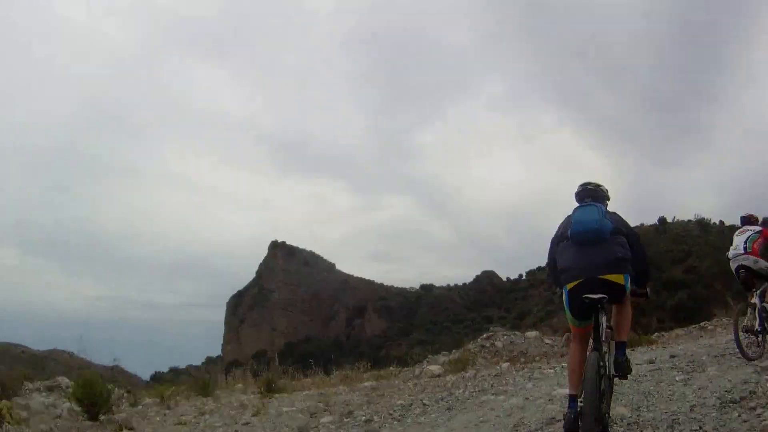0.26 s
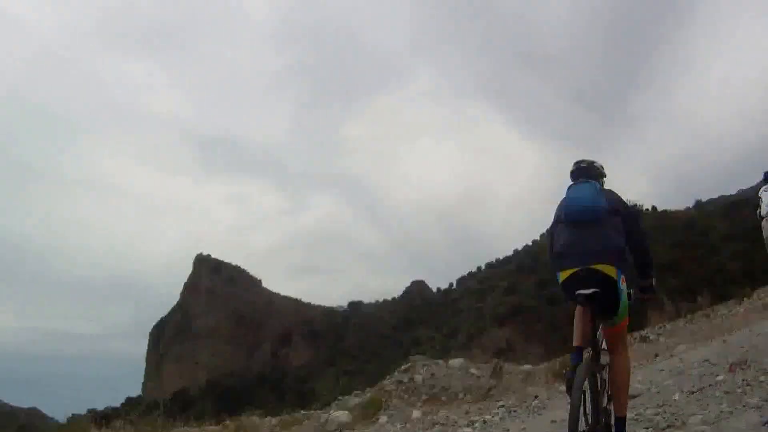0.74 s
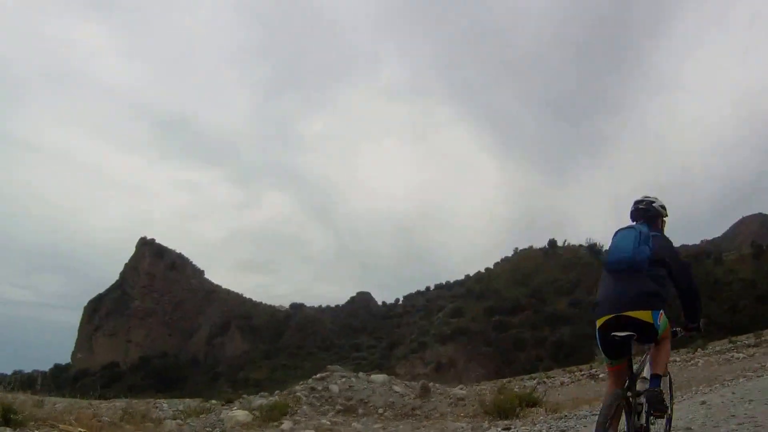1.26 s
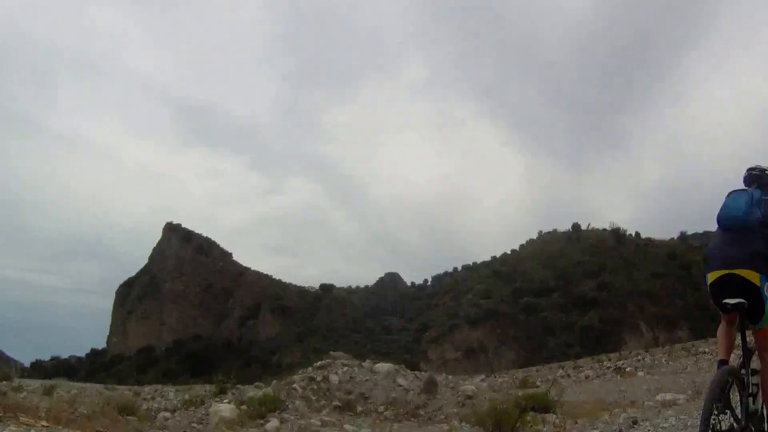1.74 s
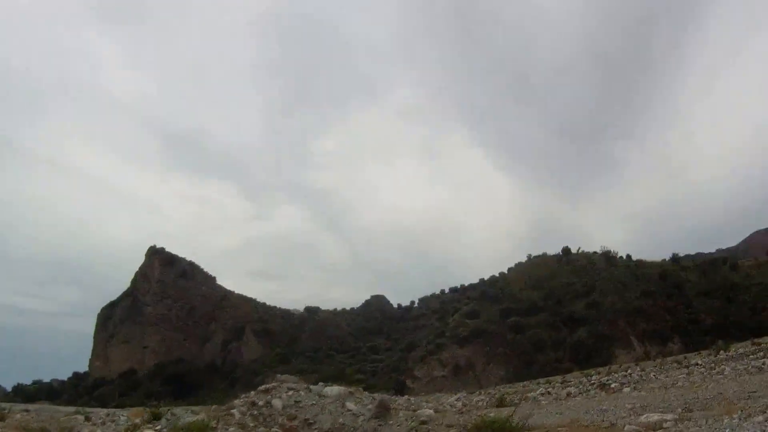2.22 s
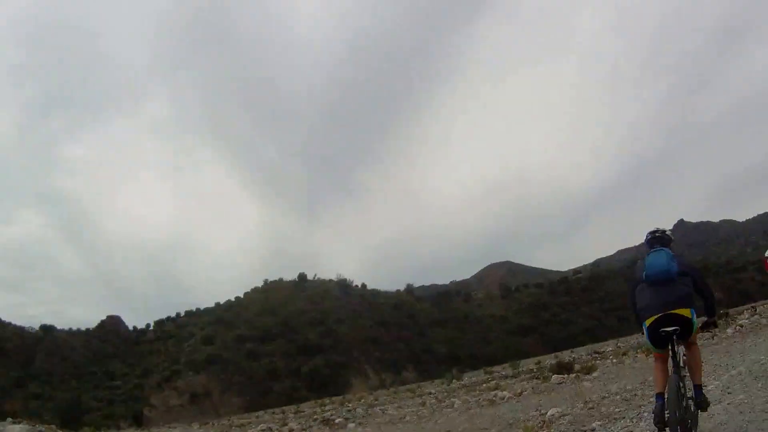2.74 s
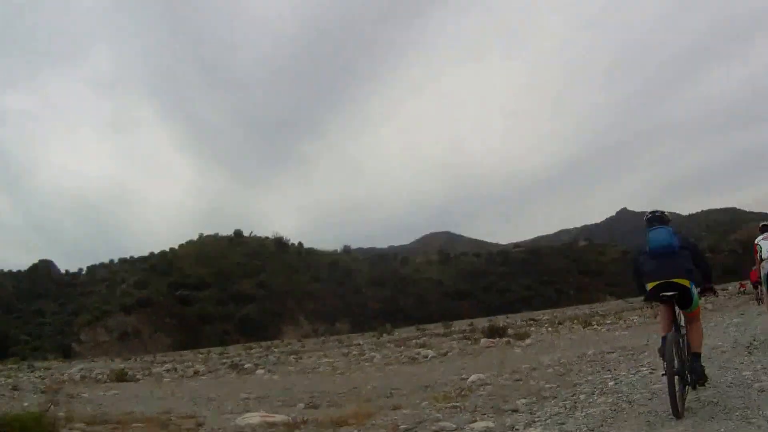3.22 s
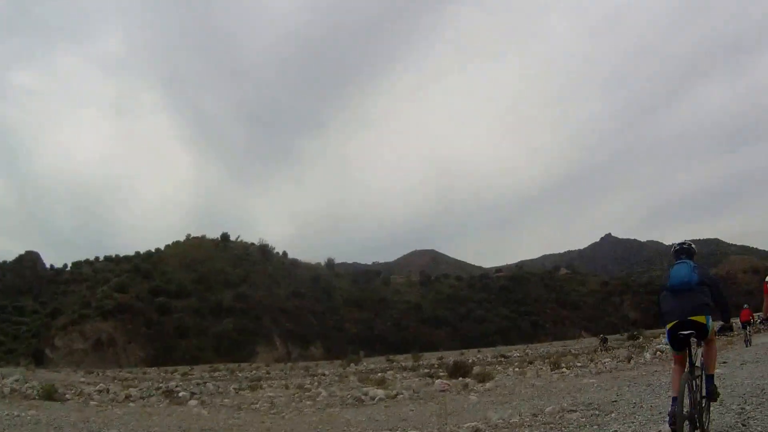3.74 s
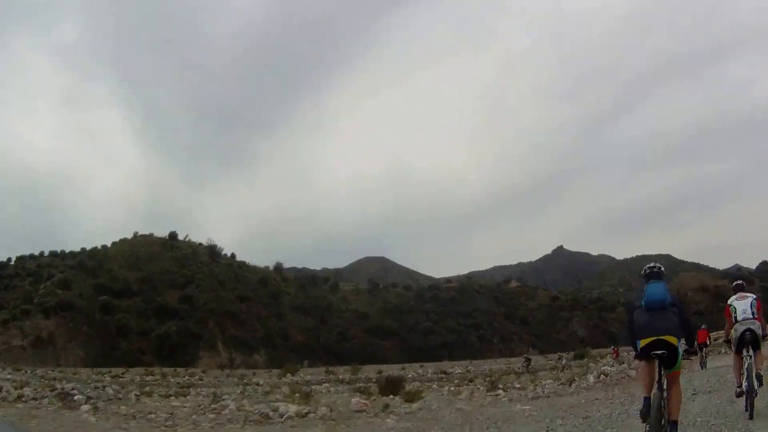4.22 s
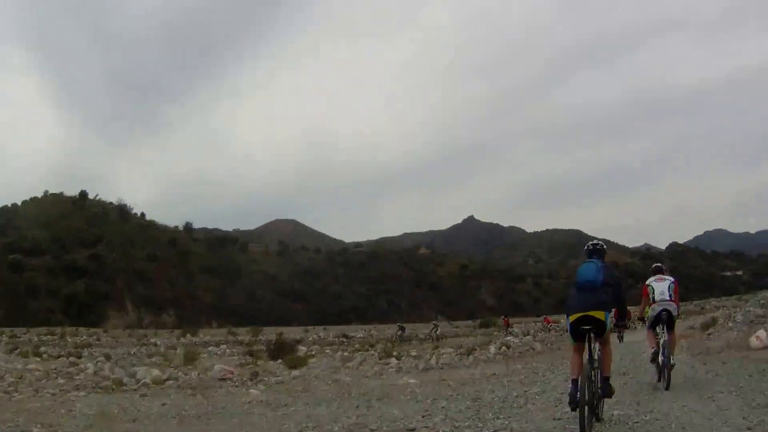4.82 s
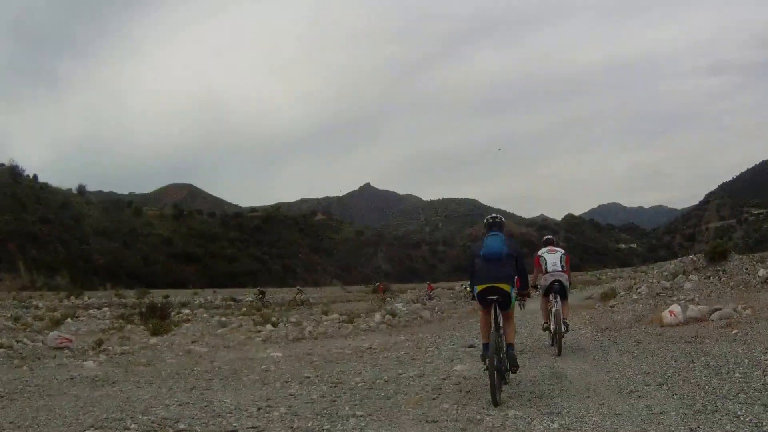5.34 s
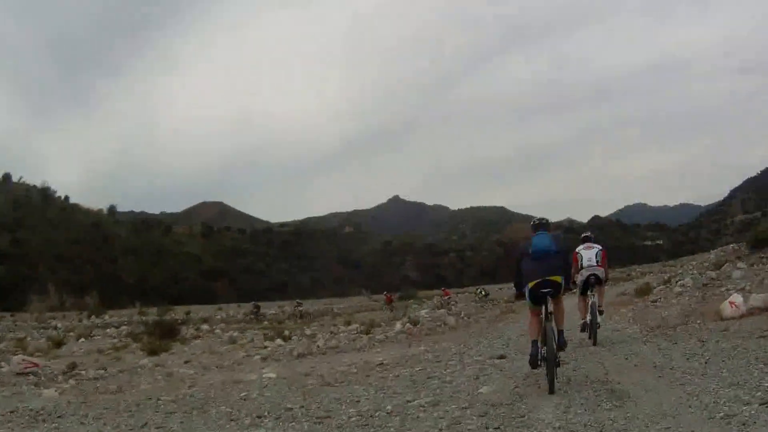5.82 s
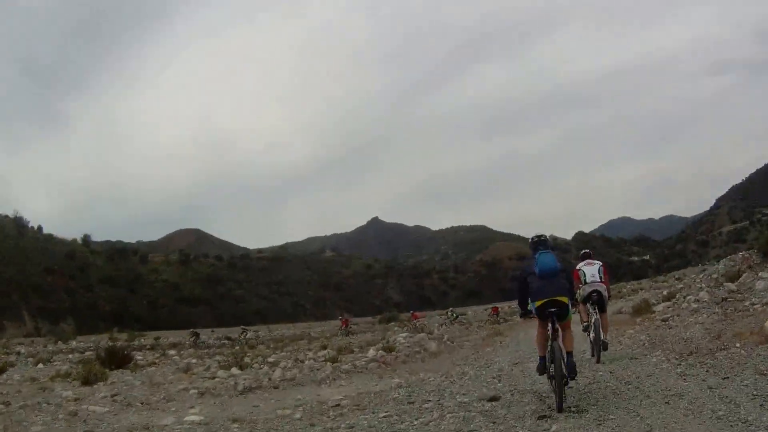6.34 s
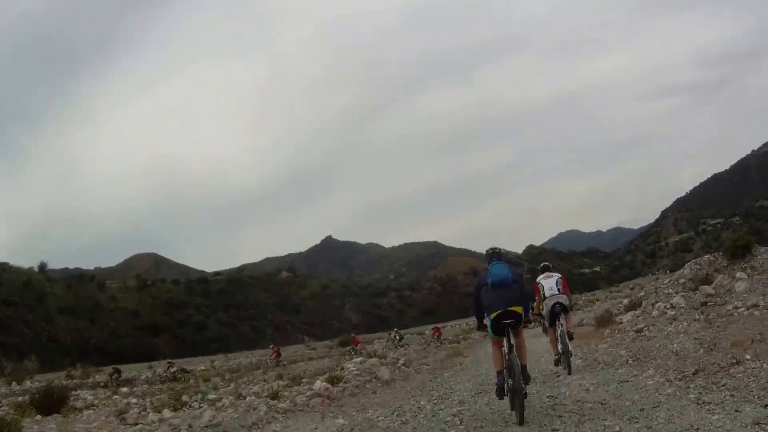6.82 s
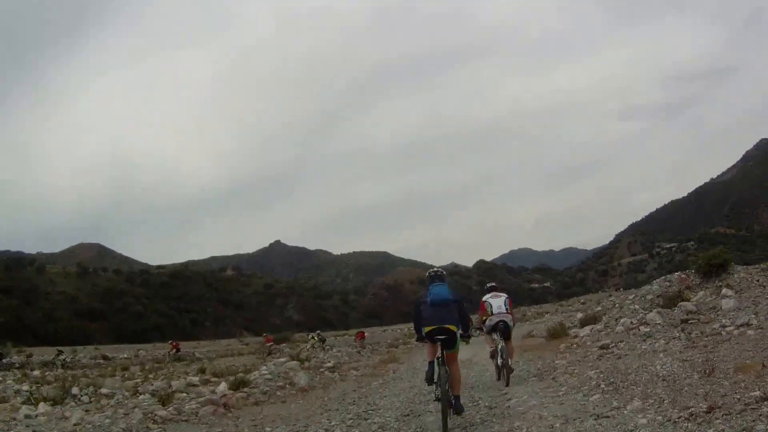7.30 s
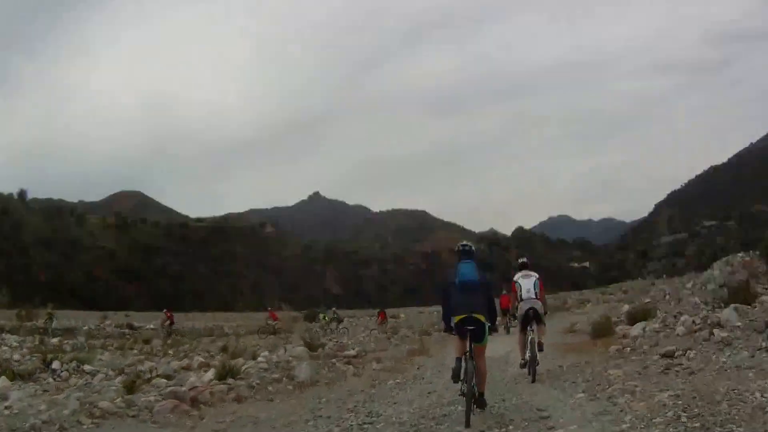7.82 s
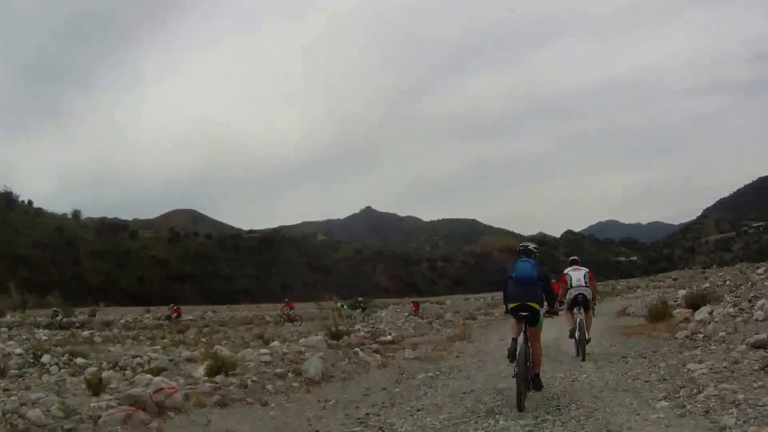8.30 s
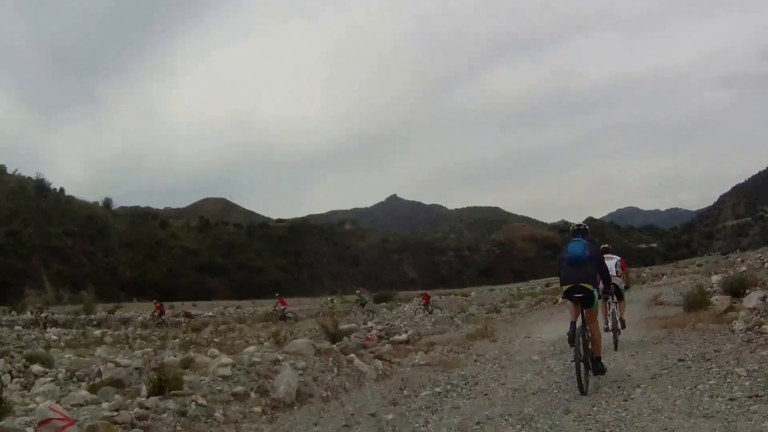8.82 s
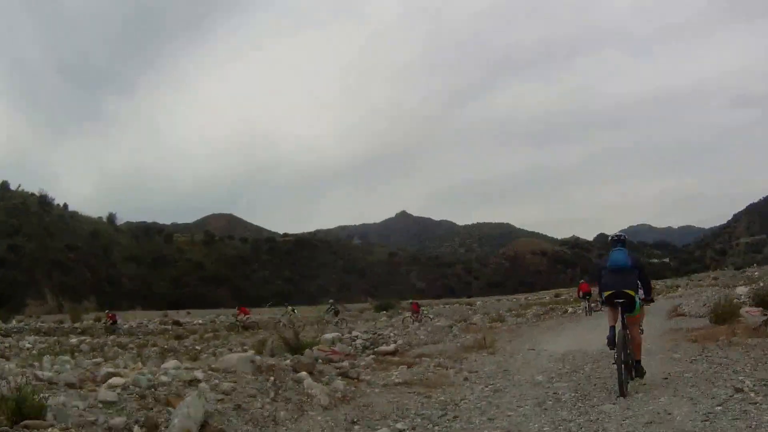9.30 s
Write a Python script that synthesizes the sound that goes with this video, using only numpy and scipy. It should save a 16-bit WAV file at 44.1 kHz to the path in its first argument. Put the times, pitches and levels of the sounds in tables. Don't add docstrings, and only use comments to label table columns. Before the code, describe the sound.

Outdoors on a rough gravel track, a mountain bike rolls over loose stones. Tyres crunch and chatter while irregular knocks rattle the mount and closed plastic housing. A dense, distorting burst of blows comes halfway, followed by a hollow tyre hum on packed ground, then more clacks, ticks and bright snaps to the end. The enclosed microphone is on the bike, very close, nearly mono and muffled.

```python
import sys
import numpy as np
from scipy import signal
from scipy.io import wavfile
from scipy.ndimage import uniform_filter1d

SR = 44100
rng = np.random.default_rng(int(sys.argv[2]) if len(sys.argv) > 2 else 0)


def convert_level_to_amplitude(level_db):
    exponent = np.asarray(level_db, float) / 20
    return 10 ** exponent


def to_wav(sig):
    pcm = np.clip(np.atleast_2d(sig), -1, 1) * 32767
    pcm = np.round(pcm).astype(np.int16)
    wavfile.write(sys.argv[1], SR, pcm.T)


N = 421594

# pitch in Hz, level in dB per Hz.
SNAP_COLOUR = [(4000, 8), (6000, 4.5), (10900, -2), (12700, -8), (14600, -1), (15600, -16), (16500, -55)]
# middle in seconds, half length in seconds, extra hum in dB.
DRONES = [
    (.3, 0.092, 8),
    (5.93, 0.39, 5.5),
    (6.72, 0.15, 4.5),
    (7.42, 0.06, 8.5),
    (8.3, 0.34, 3),
]


def evened(x):
    return x / np.sqrt(np.mean(x ** 2) + 1e-20)


def colour(points, size=1024):
    f, db = np.transpose(points)
    hz = abs(np.fft.fftfreq(8192, 1 / SR))
    log_gain = np.log(convert_level_to_amplitude(np.interp(np.log(hz + 1), np.log(f), db)))
    return np.fft.ifft(np.exp(np.conj(signal.hilbert(log_gain)))).real[:size]


def band(x, lo_hz, hi_hz, order=2):
    return signal.sosfilt(signal.butter(order, [lo_hz, hi_hz], "bandpass", fs=SR, output="sos"), x)


def noise(lo_hz, hi_hz, order=2):
    return evened(band(rng.standard_normal(N), lo_hz, hi_hz, order))


def wobble(seconds):
    size = max(round(seconds * SR), 2)
    return evened(uniform_filter1d(uniform_filter1d(rng.standard_normal(N), size), size))


def add(mix, s, sound):
    part = mix[round(s * SR):][:len(sound)]
    part += sound[:len(part)]


def over_time(rows):
    return np.interp(np.arange(N) / SR, *np.transpose(rows))


def peaks_db(rows):
    t = np.arange(0, N + 64, 64) / SR
    peaks = sum(db * np.maximum(1 - abs(t - s) / half, 0) for s, half, db in rows)
    return np.interp(np.arange(N) / SR, t, peaks)


def track_over_db():
    # time in seconds, shake in dB.
    roughness = [(0, -35.5), (.67, -31), (1.1, -29.5), (1.38, -33), (1.9, -32), (2.5, -37), (2.8, -37.5),
                 (3.2, -31.5), (3.74, -34), (4.1, -31), (4.22, -43.5), (4.56, -40.5), (4.9, -29),
                 (5.74, -35), (6.4, -31), (7.5, -33.5), (8.5, -34.5), (9.56, -33.5)]
    # middle in seconds, half length in seconds,
    # extra shake in dB.
    patches = [(0.41, 0.047, 8.5), (0.556, 0.053, 12), (0.77, 0.047, 6), (1.015, 0.091, 5),
               (1.217, 0.035, -1), (1.49, 0.049, 7.5), (1.84, 0.1, 6.5), (2.026, 0.044, 0.5),
               (2.24, 0.18, 11), (2.59, 0.3, 8), (2.968, 0.19, 8), (3.365, 0.16, 7.5), (3.61, 0.086, 0),
               (3.998, 0.023, 4.5), (4.339, 0.22, 10), (4.657, 0.14, 7), (5.086, 0.059, 7.5),
               (5.384, 0.08, 6.5), (5.536, 0.2, 2), (6.037, 0.31, -1.5), (6.182, 0.12, 7),
               (6.658, 0.073, -9), (6.995, 0.047, -2), (7.32, 0.14, 6.5), (7.66, 0.13, 5),
               (7.92, 0.09, 9.5), (8.08, 0.058, 11), (8.703, 0.22, 7.5), (9.119, 0.077, 12),
               (9.316, 0.079, 9)]
    return over_time(roughness) + peaks_db(patches) + 30


def airstream(over_db):
    air = convert_level_to_amplitude(0.26 * over_db - 86.0) * noise(4500, 10000)
    whistle = convert_level_to_amplitude(0.98 * over_db - 68 + 6.0 * wobble(.008)) * noise(14100, 15400)
    return air + whistle


def rumble(over_db):
    return convert_level_to_amplitude(0.5 * over_db - 42.035 + 1.85 * wobble(0.0085)) * noise(44, 153)


def gravel_hiss(over_db):
    return convert_level_to_amplitude(0.44 * over_db - 50 + 6.9 * wobble(0.015)) * noise(2860, 4850, order=5)


def tyre_drone():
    return convert_level_to_amplitude(1.76 * peaks_db(DRONES) - 43.5 + 3.5 * wobble(.02)) * noise(370.6, 425)


def shaken(strikes, shared_db, own_db, steady, last_s):
    # pitch in Hz, level in dB per Hz.
    frame_colour = [(150, -22.5), (380, 2.5), (604, -9), (770, 1), (929, -4.5), (1200, 1), (1670, 4.5),
                    (2440, -4), (2790, -8), (4200, -13.5), (5100, -17.5), (5600, -32.5), (12700, -42),
                    (14600, -23)]
    u = np.arange(800) / SR / last_s
    jolts = strikes * convert_level_to_amplitude(np.minimum(shared_db + own_db * rng.standard_normal(N), 4))
    shake = steady + evened(signal.oaconvolve(jolts, u * np.exp(-u))[:N])
    contacts = rng.standard_normal(N) * (rng.random(N) < 5000 / SR)
    return signal.oaconvolve(shake * contacts, colour(frame_colour))[:N]


def tyre_chatter(over_db):
    # time in seconds, play in dB.
    play = [(0, 0.5), (1.2, -2.5), (1.6, -4), (2.3, -1.5), (3.7, -5.5), (5.3, 2.5), (5.9, -1), (6.5, 3.5),
            (7.6, 1), (8.3, 0.5), (9.2, 2)]
    # pitch in Hz, width in Hz, level in dB.
    case_modes = [(399.5, 35, -7.5), (784, 60, -7), (1673, 180, -3.5), (3100, 250, -0.5), (3640, 140, 0.5),
                  (4150, 190, 0.5)]
    strikes = rng.random(N) < 190 / SR
    shared_db = 8.0 * rng.standard_normal(N)
    hum = over_db - 29.07 + peaks_db(DRONES), (100, 560, 950), 4.0, .7, .002
    rattle = 1.87 * over_db - 30.64 + over_time(play), (950, 1400, 2400), 5.0, .25, .0012
    grit = 1.85 * over_db - 31.7, (2400, 3900, 5800), 4.5, .4, .0012
    fizz = 1.87 * over_db - 50, (5800, 8500, 12500), 7.0, .25, .001
    chatter = np.zeros(N)
    for level_db, edges, own_db, steady, last_s in (hum, rattle, grit, fizz):
        part = np.zeros(N)
        for lo, hi in zip(edges, edges[1:]):
            part += band(shaken(strikes, shared_db, own_db, steady, last_s), lo, hi, order=3)
        chatter += convert_level_to_amplitude(level_db + 2 * wobble(.008)) * evened(part)
    singing = sum(convert_level_to_amplitude(db) * signal.lfilter(*signal.iirpeak(hz, hz / width, SR), chatter)
                  for hz, width, db in case_modes)
    chatter = chatter + singing
    return convert_level_to_amplitude(-2.0) * (chatter - 0.62 * band(chatter, 2120, 2860, order=1))


def roll():
    over_db = track_over_db()
    ground = rumble(over_db) + gravel_hiss(over_db) + tyre_drone()
    return airstream(over_db) + ground + tyre_chatter(over_db)


def scrapes():
    # middle in seconds, length in seconds, level in dB.
    rubs = [
        (0.384, 0.034, -23),
        (0.531, 0.011, -20),
        (1.078, 0.041, -23),
        (5.199, 0.054, -23),
        (7.92, 0.069, -24.5),
    ]
    swell = np.zeros(N)
    for s, length, db in rubs:
        add(swell, s - length / 2, convert_level_to_amplitude(db) * np.hanning(round(length * SR)))
    grain = rng.standard_normal(N)
    squeak = evened(band(grain, 4170, 4740))
    lower = band(grain, 3900, 4000, order=4)
    return swell * evened(squeak + 0.26 * evened(lower))


def bounces(last_s, per_s, rise_s, size=700):
    t = np.arange(size) / SR
    chance, strength = rng.random(size), rng.standard_normal(size)
    return (chance < per_s / SR) * strength * (1 - np.exp(-t / rise_s)) * np.exp(-t / last_s)


def pings():
    # start in seconds, level in dB.
    spring_hits = [
        (1.8248, -14),
        (3.535, -12),
        (5.9413, -25),
        (6.9423, -22),
    ]
    out, t = np.zeros(N), np.arange(300) / SR
    for s, db in spring_hits:
        crackle = bounces(0.00077, 7600, 0.00018, size=200)
        spring = np.exp(-t / 0.00071) * np.sin(2 * np.pi * 14500 * t)
        add(out, s, convert_level_to_amplitude(db - 14) * evened(np.convolve(crackle, spring)))
        add(out, s, convert_level_to_amplitude(db - 16) * evened(band(np.pad(crackle, (0, 200)), 2200, 13300)))
    return out


def snaps():
    # start in seconds, level in dB.
    snap_hits = [(0.538, -21), (0.561, -12), (0.7662, -16), (1.823, -28), (1.855, -20), (2.0247, -42),
                 (2.155, -41), (2.23, -23), (2.237, -16), (3.3027, -19), (3.531, -24), (4.682, -16),
                 (5.0309, -38), (5.0572, -16), (5.0777, -9), (5.1217, -18), (5.1336, -16.5), (5.3574, -18),
                 (5.517, -16), (6.708, -20), (6.9403, -16), (7.2832, -19), (7.9463, -18.5), (8.0922, -13),
                 (8.983, -17.5), (9.075, -14), (9.11, -15), (9.126, -16), (9.531, -18), (9.548, -15)]
    out, taps = np.zeros(N), colour(SNAP_COLOUR)
    for s, db in snap_hits:
        crackle = np.convolve(bounces(0.0026, 7400, 0.00017, size=300), taps)
        add(out, s, convert_level_to_amplitude(db - 3.5) * crackle / np.sqrt(np.mean(crackle[:100] ** 2)))
    return out


def all_knocks():
    # start in seconds, mount level in dB,
    # back wall in dB, front wall in dB, latch in dB.
    slams = [(0.412, -20, -12, -16.0, -16.5), (0.4725, -28, -23, -13, -34), (0.5609, -9, -25, -30.7, -6),
             (0.6146, -20, -14, -13, -28), (0.7008, -14, -28, -16, -15), (0.7446, -23, -11.8, -17, -20),
             (0.7601, -9.5, -16.5, -15.1, -14.8), (1.0274, -10, -20, -13.5, -12.5),
             (1.405, -25, -34, -13, -12.5), (1.465, -15.7, -24, -13, -15), (1.64, -15, -20, -16, -16),
             (1.6984, -26.5, -34, -15, -16.5), (1.8566, -27, -28, -16.0, -17.3),
             (1.8763, -30, -18, -11, -17.5), (1.9583, -17.5, -30, -21, -13.5),
             (2.0244, -14.4, -24, -17.5, -9), (2.1546, -18, -29, -11.5, -11.5),
             (2.2402, -16.9, -22.2, -16, -10), (2.3972, -23, -23, -15.5, -21),
             (2.536, -16, -24, -12.8, -12), (2.5771, -26, -15, -16, -15), (3.3056, -22, -24, -17, -16),
             (3.354, -15, -33, -13, -12), (3.4059, -25, -27, -20, -12.5),
             (3.5334, -23.2, -32.0, -37, -11.5), (3.6089, -12, -19, -16, -17),
             (3.619, -12, -26, -14.5, -13.7), (4.1068, -11, -24, -17.5, -13),
             (4.6818, -13.5, -18, -12, -14.1), (4.7864, -13, -27, -18.9, -18),
             (5.0303, -30, -29, -7, -11.5), (5.0553, -21, -13.5, -18, -13.0), (5.0782, -24, -28, -12, -7.5),
             (5.1224, -14, -11, -18, -16), (5.1589, -33, -13, -19.6, -23), (5.2179, -11.5, -17, -13, -20),
             (5.2638, -18, -27, -13.5, -20), (5.3413, -21, -23.8, -14, -17), (5.3578, -21, -18, -7.5, -18),
             (5.3856, -16, -10.5, -16, -21),
             (5.4512, -29, -18, -14.5, -22), (5.4704, -12, -34, -15, -13.5),
                  (5.5145, -13.1, -8.5, -14, -9.5), (5.6283, -27, -25, -14.3, -15),
                  (6.0704, -22, -29, -21, -14.5), (6.0911, -33, -13, -22, -26),
                  (6.1568, -17, -19, -12.5, -16), (6.4456, -20, -18, -26, -32),
                  (6.7081, -17.5, -26, -14, -14.5), (6.7756, -20, -12, -30, -24),
                  (6.8443, -15, -11.4, -22, -23), (6.9064, -28, -15, -34, -31.6),
                  (6.9466, -18.5, -26, -15, -23), (7.101, -26, -18, -15.5, -22.5),
                  (7.1857, -21, -19, -17.4, -21), (7.2166, -27, -13, -19.5, -23.9),
                  (7.282, -21, -16.5, -8.5, -12), (7.3009, -14.8, -16, -26, -24.6),
                  (7.3201, -22, -27, -10.4, -16.5), (7.3381, -25.4, -32, -19.5, -15.0),
                  (7.652, -15.8, -14, -17, -22), (7.8775, -25.6, -14, -13, -16),
                  (7.8957, -22, -18, -11.0, -17.5), (7.9457, -15.5, -9, -15, -22),
                  (7.965, -17, -17, -23, -16.5), (8.0576, -29, -14.5, -22, -31),
                  (8.6395, -17, -21, -9, -16.8), (8.7345, -22, -16.5, -16.8, -20.3),
                  (8.7915, -15.5, -21, -18, -23.2), (8.8458, -17, -13, -20.0, -12),
                  (8.9821, -27, -17.5, -14.5, -16), (9.0504, -20, -28.4, -17.5, -15.5),
                  (9.0756, -13.0, -19.7, -18, -12), (9.1083, -9, -23, -14.1, -9),
                  (9.1265, -19, -19.1, -13, -21), (9.1877, -26, -11, -16.9, -18),
                  (9.2962, -21, -17, -19, -23.2), (9.398, -25, -13, -15.5, -19),
                  (9.5126, -28, -34, -13, -15), (9.5474, -12.4, -24, -14, -17.5)]
    # start in seconds, level in dB, front wall over back wall in dB.
    thuds = [(0.2568, -21, 11.1), (0.3105, -16, 2.2), (0.3742, -19, 4.9), (0.501, -18, 6),
             (0.6268, -19, 13.8), (0.7097, -16, -1.5), (1.2091, -19.5, 5.5), (1.4266, -17.2, 11),
             (1.4731, -22.5, 12), (1.5562, -20.5, 2), (1.759, -20.5, 6.4), (1.8438, -21.5, 4),
             (1.9202, -23, -7.7), (2.0887, -15, 14), (2.1136, -23.5, 2.3), (2.2713, -18, 8),
             (2.6103, -25, 5.8), (2.639, -25, -3), (2.8683, -27.5, 7), (2.9388, -15.5, 12),
             (3.1177, -21.5, 5), (3.2763, -19, 6.2), (3.2856, -18, 0.1), (3.2959, -13.5, 7.0),
             (3.3237, -20, -13), (3.3413, -11.5, 4.3), (3.3933, -15.7, 8), (3.783, -21, 6),
             (3.9178, -21.5, 1), (3.9864, -16, 8.7), (4.0203, -22, 6.9), (4.1369, -18.5, 3),
             (4.9183, -18, 3), (5.0878, -20, 3.3), (5.2376, -19.5, -2.4), (5.3965, -19, -5.7),
             (5.5393, -16.5, 2), (5.5847, -24, -6), (5.6869, -22.5, -18.3), (5.8681, -24.5, -10),
             (6.6276, -19.0, 6.8), (6.7217, -15, 7.4), (6.7603, -25, 3), (6.8672, -18.3, 0.0),
             (7.2428, -24, -2.7), (7.2676, -20, -1.3), (7.4218, -22.3, -21.2), (7.6175, -18.5, 9),
             (7.7051, -22, -8), (7.7683, -22.5, 9), (8.0935, -14, -1.4), (8.1067, -17.0, 10),
             (8.3104, -27, 4.5), (8.5591, -20, -2), (8.6543, -15.1, 2), (8.6991, -17, 4),
             (8.7118, -19, 3.1), (8.9099, -19.5, 13), (9.2139, -20.3, -6), (9.532, -12.5, 4)]
    clacks = [(0.4637, -18, 6), (0.7305, -19, 13), (0.818, -17.6, -3), (0.8849, -14, 13),
              (0.914, -14, 12.8), (1.2537, -20.9, -3.5), (1.5161, -19, 15), (1.9949, -16.5, -2),
              (2.9457, -18, 6), (2.9649, -19.1, 0), (3.3796, -16.9, -1.7), (3.665, -24.0, 8),
              (4.8287, -17.5, 6.7), (4.8642, -19.0, 10.4), (5.0639, -14.5, 3.1), (5.1681, -21.0, 6.5),
              (5.2471, -15, -13), (5.3228, -23, -12.0), (5.3324, -28, 3.1), (5.3747, -15.4, -7),
              (5.4086, -20, -2), (6.1359, -23, 1.5), (6.1873, -13.5, 2), (6.2053, -17.3, 8.6),
              (6.2266, -22, -5), (6.2988, -16, 17.5), (6.3089, -17.5, 11.1), (6.3314, -16, -4),
              (6.3734, -20.9, 2.9), (6.3852, -17.5, -12), (6.4376, -14.7, -8), (6.464, -15, 12),
              (6.5231, -16.4, 6), (6.5332, -23.5, 5), (6.5724, -16, -6), (6.8166, -15, -5),
              (6.8853, -20, -17), (6.9275, -15, 1), (7.0363, -18.5, -10), (7.1302, -23, -11),
              (7.1644, -18, 8), (7.5274, -21.2, -7), (7.5422, -16, -9.9), (7.6417, -13, -3),
              (7.7527, -22.3, -8), (7.7814, -17, 4.7), (7.9268, -15, -3.9), (7.9815, -18, 15),
              (8.0043, -15, -6.3), (8.0301, -15.5, 3), (8.114, -20, 8.5), (8.393, -18.5, -6),
              (8.456, -22.5, -7.7), (8.58, -21, -11), (8.7239, -16, 3.1), (8.751, -19, 3),
              (8.8017, -14, -5.2), (9.205, -21, -3.1), (9.3465, -19.1, 4.7), (9.3615, -18, -4.5)]
    ticks = [(0.3423, -23.5, 6.0), (0.5462, -12.5, 9), (0.5997, -17, 15), (0.6746, -22.5, -2.2),
             (0.7214, -32, 7.4), (0.7854, -19, 4), (0.8736, -16, 8), (0.9341, -22.5, 15), (1.0104, -18, 7),
             (1.0462, -16.5, 9.7), (1.0795, -27.5, -5), (1.1449, -19, 9), (1.2009, -19.5, 23),
             (1.6667, -25.5, 9.1), (1.7801, -18.5, 2), (1.8234, -17.5, 1), (2.1803, -29, 2.4),
             (2.194, -17.5, 12), (2.2275, -12, 12), (2.2976, -20, 5.2), (2.3676, -24.5, -11),
             (2.4446, -22, 10), (2.4843, -25, -1), (2.7034, -26.9, 8), (2.8974, -22, 2.4),
             (3.0318, -27.5, 9.2), (3.0464, -19, 13), (3.2632, -22.3, 11), (3.365, -25, -3),
             (3.4699, -19.5, 10), (3.4987, -27, 8), (3.556, -22, 3.5), (3.8019, -26, 13),
             (4.2661, -23.5, 1), (4.3693, -23.0, 9), (4.8023, -17.5, 14.6), (4.8508, -18.9, 8.1),
             (4.9004, -24, 0), (4.9386, -23, 24.4), (4.9548, -20.6, 5.8), (5.0068, -21.5, 10),
             (5.1332, -18.1, 0.8), (5.1463, -23, -13.2), (5.366, -18.5, -1.6), (5.554, -19, 8),
             (5.9412, -24.5, 2), (6.1156, -26, 7.6), (6.3411, -19, 5.4), (6.5491, -25.5, 6.3),
             (7.9153, -24, 1.5), (8.2244, -19.5, 9), (8.3712, -23, 1), (8.6765, -20, 8.7), (8.69, -30, 5.3),
             (9.1363, -26, 4), (9.1475, -29, 10.4), (9.2318, -21.5, 1), (9.2402, -22, 2.9),
             (9.2602, -20.5, 5.2), (9.322, -16, 7)]
    # mount dB, housing dB, latch dB
    thud_share, clack_share, tick_share = (0.084, -2.5, -6.5), (-10.5, 0.1, -14), (-6.5, -1.8, 0.1)
    rows = slams
    for table, share_db in (thuds, thud_share), (clacks, clack_share), (ticks, tick_share):
        for s, db, lean_db in table:
            mount_db, wall_db, latch_db = db + np.array(share_db) + 1.5 * rng.standard_normal(3)
            back_db = wall_db - 10 * np.log10(1 + convert_level_to_amplitude(lean_db) ** 2)
            rows.append((s, mount_db, back_db, back_db + lean_db, latch_db))
    return rows


def ring(modes, blow, db, over_s, spread_db, detune):
    t = np.arange(900) / SR
    hz, width, mode_db = np.transpose(modes)[:, :, None]
    luck = rng.standard_normal((2, len(modes), 1))
    decay = convert_level_to_amplitude(mode_db + spread_db * luck[0]) * np.exp(-np.pi * width * t)
    body = decay * np.sin(2 * np.pi * hz * (1 + detune * luck[1]) * t)
    sound = signal.fftconvolve(blow, body.sum(0))
    loudest = uniform_filter1d(sound ** 2, round(over_s * SR), mode="constant").max()
    return convert_level_to_amplitude(db) * sound / np.sqrt(loudest)


def knocks():
    # pitch in Hz, width in Hz, level in dB.
    mount_modes = [(306, 370, 5.5), (440, 20, -2.5), (600, 1600, -55), (796, 37.6, 15.5)]
    housing_modes = [(1115, 68, 0.5), (1269, 96, 4.8), (1690, 84, 11.8), (2214, 280, 9.7)]
    latch_modes = [(2790, 630, 24.5), (3500, 150, 6.5), (3804, 72, 2.5), (4700, 110, -7)]
    out, edge, shove = np.zeros((3, N))
    for s, thud_db, back_db, front_db, tick_db in all_knocks():
        last_s = rng.uniform(.0013, .003)
        slow_db = np.clip(thud_db - tick_db + rng.uniform(6, 18), 0, 20)
        blow = bounces(last_s, 8000, .0002 * convert_level_to_amplitude(slow_db))
        add(out, s, ring(mount_modes, blow, thud_db + 0.24, 0.0023, 4.0, 0.045))
        add(out, s, ring(housing_modes[:2], blow, back_db + .3, .005, 4.0, .05))
        add(out, s, ring(housing_modes[2:], blow, front_db + .3, .005, 4.0, .05))
        add(out, s, ring(latch_modes, blow, tick_db + 2.5, 0.0063, 7.1, 0.059))
        edge_gain = convert_level_to_amplitude(1.2 * tick_db + 4 * rng.standard_normal())
        add(edge, s, edge_gain * blow * np.exp(-np.arange(len(blow)) / 90))
        add(shove, s, convert_level_to_amplitude(0.53 * thud_db) * blow)
    shut = band(out, 215.3, 5040, order=6)
    shut = signal.lfilter(*signal.iirnotch(2430, 5, SR), shut)
    bright = convert_level_to_amplitude(4.5) * signal.oaconvolve(edge, colour(SNAP_COLOUR))[:N]
    return shut + bright + convert_level_to_amplitude(16.5) * band(shove, 23, 154)


def stray(x):
    hz, t, z = signal.stft(band(x, 2300, 22000, order=1) * wobble(0.00046), SR, nperseg=2048)
    pitch_group = (40 * (hz / SR) ** .6).astype(int)
    chance = rng.random((40, len(t) // 2 + 1))[pitch_group].repeat(2, 1)[:, :len(t)]
    spell = uniform_filter1d(rng.standard_normal(len(t)), 2)
    likely = chance < .25 + .5 * spell + hz[:, None] / 40000
    on = likely * (spell > -.2) * (hz[:, None] < 15500)
    gain = convert_level_to_amplitude(np.interp(hz, [600, 5000, 8000], [-21, -20, -11]))[:, None]
    return signal.istft(z * on * gain, SR, nperseg=2048)[1][:N]


def scene():
    return np.tile(roll() + scrapes() + pings() + snaps() + knocks(), (2, 1))


def band_limit(x):
    return signal.sosfilt(signal.butter(12, 16430, fs=SR, output="sos"), x)


def record(dry):
    loud = np.clip(dry, -.97, .97)
    parted = loud + np.array([[1], [-1]]) * stray(loud[0])
    top_cut = signal.firwin(201, 16400, fs=SR)[None]
    return band_limit(signal.oaconvolve(parted, top_cut, "same"))


dry = scene()
out = record(dry)
to_wav(out)
```